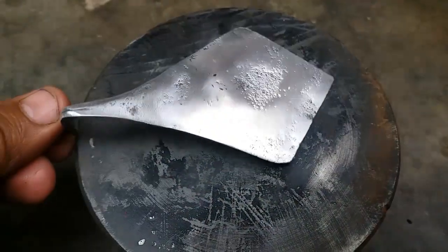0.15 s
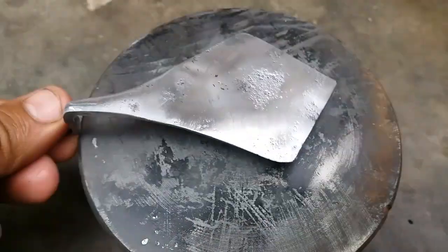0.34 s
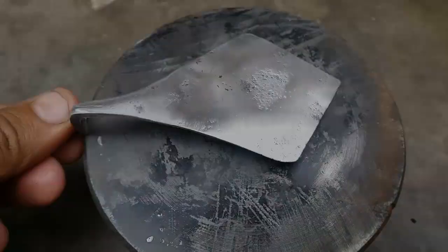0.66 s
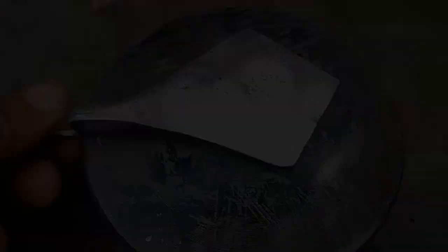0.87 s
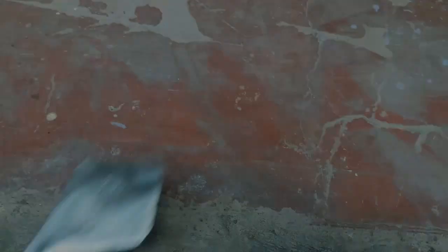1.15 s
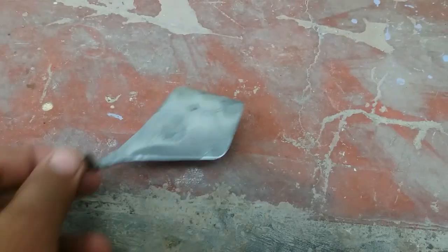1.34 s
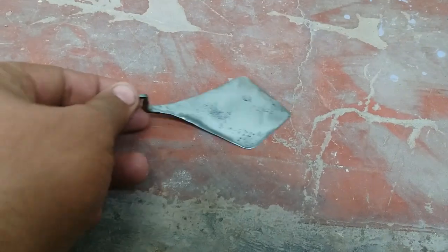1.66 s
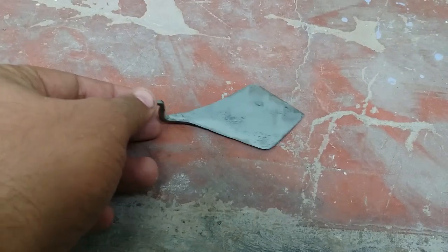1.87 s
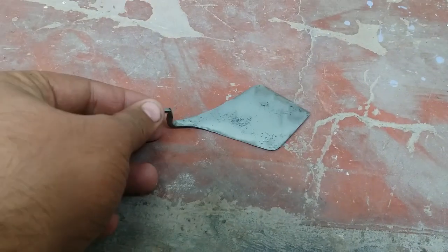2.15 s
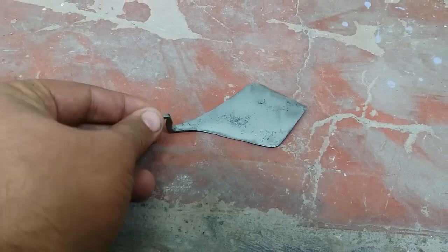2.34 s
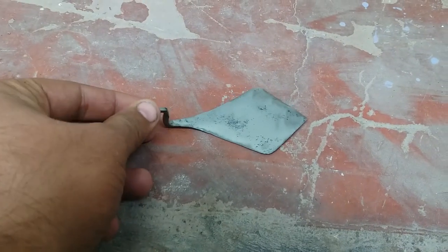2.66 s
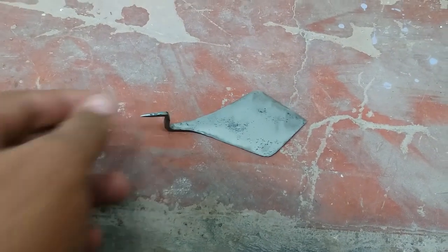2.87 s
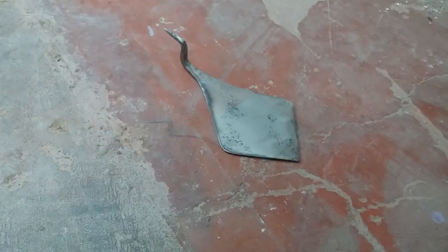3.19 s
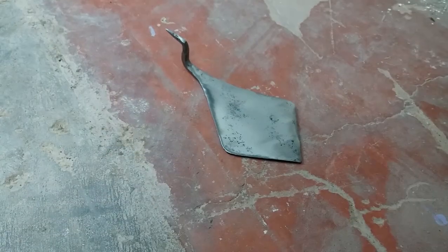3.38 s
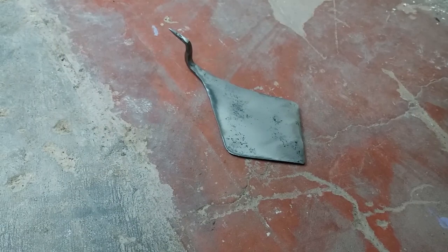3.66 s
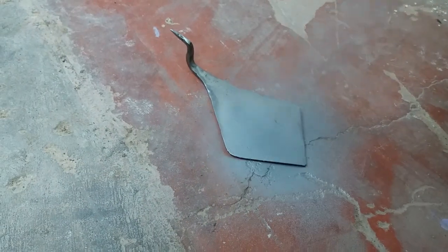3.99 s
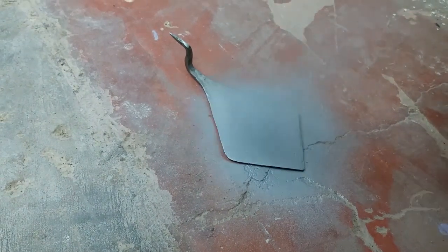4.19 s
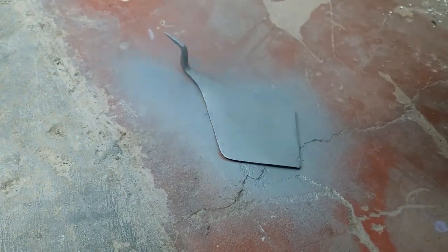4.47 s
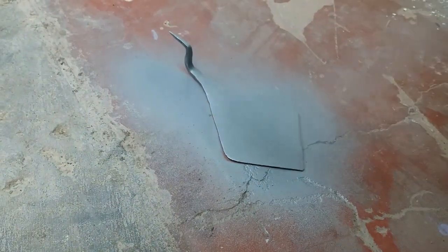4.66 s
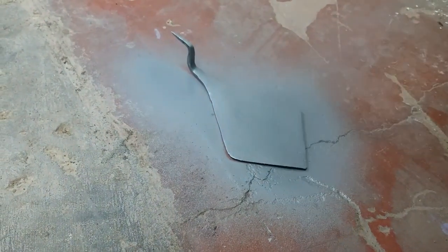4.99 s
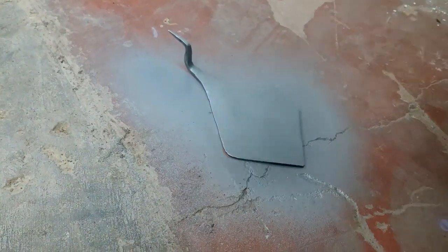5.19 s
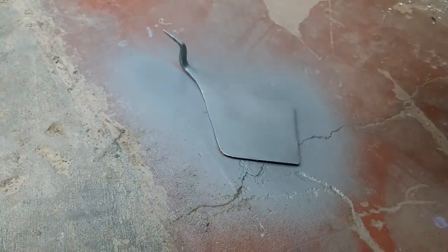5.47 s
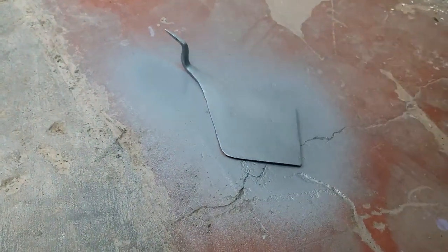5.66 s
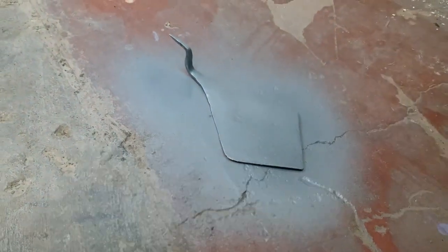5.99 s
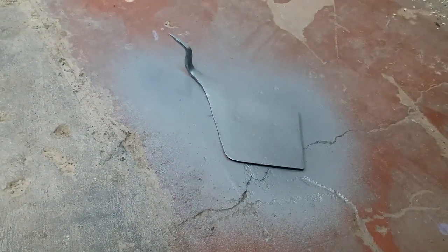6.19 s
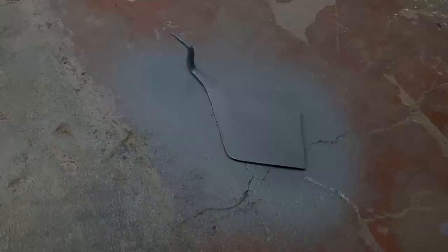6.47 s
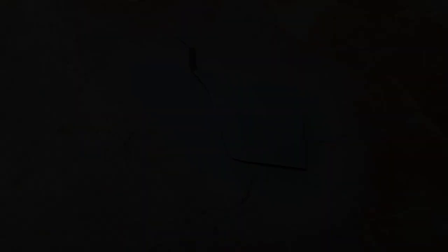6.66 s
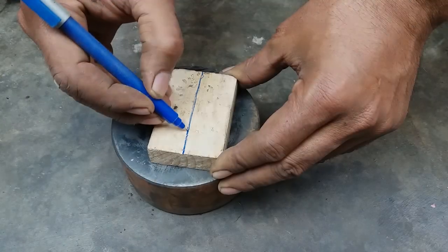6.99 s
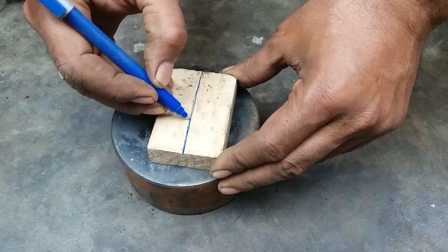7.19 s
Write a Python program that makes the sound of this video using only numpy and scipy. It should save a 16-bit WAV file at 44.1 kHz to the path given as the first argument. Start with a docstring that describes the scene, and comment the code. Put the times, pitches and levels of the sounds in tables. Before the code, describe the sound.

A thin metal plate ticks, rocks and drags on paving amid quick scratchy strokes, before a two-second aerosol hiss and a few light scuffs.

```python
"""A paved yard at two microphone ports. Quick scraping strokes (dense clicks, coloured and ringing) come from
the right; a thin metal plate rocks to rest, ticks and is dragged (damped modes), and a dull knock falls in.
Then a spray can hisses (noise combed by short echoes), swinging twice towards the middle, and lighter scuffs
follow. Far rumble, a far motor's hum in the second stretch and air noise (shaped noise and wavering sines) lie
below, the rumble and air stepping to another level and colour three times."""
import sys
import numpy as np
from scipy import signal
from scipy.fft import rfft, irfft, next_fast_len
from scipy.io import wavfile

SR = 44100
rng = np.random.default_rng(int(sys.argv[2]) if len(sys.argv) > 2 else 0)


def rack_gain(trim_db):
    """Turn a fader trim in dB into the linear factor to multiply a signal by."""
    fader = np.asarray(trim_db, float)
    return 10 ** (fader / 20)


def bounce(signal):
    """Save signal as a 16-bit WAV file at the path given by the first command-line argument."""
    frames = np.transpose(np.atleast_2d(signal))
    limited = np.clip(frames, -1, 1)
    pcm = np.round(limited * 32767).astype(np.int16)
    wavfile.write(sys.argv[1], SR, pcm)


N = 323496

# All spectra are shapes: [f/Hz, level/dB per Hz], scaled to rms 1 before use.
# scraping strokes: [bite t/s, peak t/s, bite level/dB, peak level/dB, t/s to fall by LET_GO_DB]
STROKES = [(.034, .036, -63, -83, 0.43), (1.082, 1.148, -47.5, -33, 0.09), (1.444, 1.505, -46, -35, 0.06),
           (1.773, 1.817, -46.5, -35, 0.0381), (2.116, 2.195, -53, -37.5, 0.0366),
           (2.482, 2.55, -46.5, -38.5, 0.0567), (2.838, 2.905, -48.5, -39, 0.0764),
           (3.017, 3.05, -55, -46, 0.04)]
# spectrum of the strokes' body: [f/Hz, level/dB per Hz]
STROKE_BODY = [(260, -45), (509, -28.5), (659, -16), (783, -29.5), (1520, -19.5), (1830, -20.5),
               (2400, -9.5), (3060, -8), (3780, -1.5), (6170, -9), (8500, -25), (11000, -53), (18700, -120)]
# light rubbing between the strokes: [t/s, body level/dB]
RUBBING = [(.95, -88), (.975, -74), (1.07, -66.5), (1.29, -62), (1.33, -71), (1.43, -73.5), (1.58, -57.5),
           (1.74, -59.5), (1.9, -57), (1.96, -65.5), (2.02, -69), (2.04, -85.5), (2.3, -67.5), (2.45, -76),
           (2.7, -67), (2.8, -75), (3.11, -79.5), (3.16, -66.5), (3.18, -70.5)]
# resonances of the scraped thing: [f/Hz, level/dB, t60/s]
SCRAPED_MODES = [(2890, -8, .04), (3246, -3.5, .04), (3640, 0.5, 0.055), (3850, -1, .035),
                 (4286, -1, 0.036), (4610, -4, .04), (5070, -3, 0.051), (5330, -4, .04), (5730, -7, .04),
                 (5960, -8, .04), (6330, -11, .03)]
# lighter scuffs: [bite t/s, peak t/s, bite level/dB, peak level/dB, t/s to fall by LET_GO_DB]
SCUFFS = [(5.655, 5.68, -54, -54.5, 0.11), (5.71, 5.762, -59, -60.5, 0.1), (5.81, 5.853, -63.5, -51, .06),
          (6.184, 6.21, -65, -60.5, 0.1156), (6.321, 6.345, -66, -60.5, 0.02),
          (6.59, 6.593, -66, -68, 0.03), (6.644, 6.707, -63, -63, .003)]
# spectrum of the scuffs' body: [f/Hz, level/dB per Hz]
SCUFF_BODY = [(880, -55.5), (1500, -18), (1710, -3.5), (2270, -6), (2480, 1), (3310, 0), (4270, -5.5),
              (6550, -4), (6990, -17), (8500, -20), (11000, -21.5), (18700, -120)]
# resonances under the scuffs: [f/Hz, level/dB, t60/s]
SCUFFED_MODES = [(2821, 2.5, 0.031), (3260, 0, 0.0247), (3750, -6, 0.0235), (6572, -10, 0.015)]
# treble of all scraping: [f/Hz, level/dB per Hz]
GRIT = [(4410, -34.5), (7500, -5.5), (9250, -5.5), (10100, -5.5), (13700, -8), (15100, -2), (16000, -16)]
# the edge bites within BITE_S; after the peak the level falls ever faster
BITE_S, LET_GO_DB, LET_GO_CURVE = 0.011, 19, 1.315

# hiss of the spray can: [t/s, level/dB]
JET = [(3.615, -95), (3.642, -59), (3.7, -50), (3.73, -43.5), (3.8, -41.5), (4.1, -42), (4.38, -43.5),
       (4.7, -42.5), (4.95, -44), (5.3, -45.5), (5.65, -52), (5.7, -80), (5.77, -65), (5.8, -89)]
# spectrum of the hiss: [f/Hz, level/dB per Hz]
JET_COLOUR = [(170, -17), (270, -2.5), (390, -2), (520, -11), (680, -19), (900, -15.5), (1300, -7),
              (1600, -5), (1900, -1.5), (2800, -2.5), (3450, -5), (4200, -8.5), (5200, -11), (8000, -10),
              (9300, -13), (11000, -9.5), (12500, -9.5), (13600, -9.5), (16000, -4)]
# left-right balance of the hiss by pitch: [f/Hz, left minus right level/dB]
JET_LEAN = [(700, -2.8), (1030, -6), (1400, 0.5), (3000, 0.5), (3800, -2.5), (4300, -3.5), (4800, 0),
            (5800, 4), (7500, -1), (10500, 1.5), (12200, 8.5), (13500, 2.5), (15500, -0.5)]
# reflections off paving, plate and hand: [delay/ms, gain, share of the sideways lag added to the delay]
ECHO_LEFT = [(0.444, -0.28, 0.31), (0.7344, -0.26, 0.5), (0.246, -0.29, 0.9237), (0.3897, 0.25, 0.3295),
             (0.6455, -0.32, 0.87)]
ECHO_RIGHT = [(0.421, 0.35, -0.13), (0.995, 0.097, -0.13), (0.547, -0.14, 0.15), (0.491, -0.29, -0.31),
              (0.05, -0.25, 0.34)]
# the can swings towards the middle and back: [t/s, half-length/s, lag at the turn/microseconds]
PASSES = [(4.405, 0.22, 31), (5.378, 0.26, 18)]
# can held to the right: the left port lags
ASIDE_LAG_US, PASS_SQUARENESS = 108, 4.5
# left-over-right level; the lean to the left eases slightly as the lag shrinks
PAN_ASIDE_DB, PAN_DB_PER_US = 1, -0.0046
FULL_FLOW_S = 3.72   # before the valve opens up to this time, it only leaks a thin, high hiss
# the jet's lows and the rumble under it both swell
JET_LOWS_HZ, JET_RUMBLE_GROWS_DB_PER_S = 900, 2.5

# modes of the plate, damped by the paving: [f/Hz, level/dB before scaling, free t60/s]
PLATE_MODES = [(2890, -3.5, 0.03), (3650, -5, 0.026), (4330, 10, 0.032), (4950, 5.5, 0.029),
               (5550, 4, 0.016), (6400, -6.5, 0.016), (8150, -11, 0.0161), (9100, -11, 0.028),
               (11300, -15, 0.0202)]
# ticks of plate and grit: [t/s, level/dB, f/Hz and f/Hz of the modes nearest the spot, share of free t60]
TICKS = [(0.0363, -52, 4330, 8200, 0.68), (0.5141, -39, 4950, 3530, 0.31), (0.9712, -54, 5700, 5700, 0.55),
         (1.5736, -29, 4330, 8500, .9), (1.574, -31, 5700, 5700, 1), (1.8784, -41, 4190, 11300, 0.85),
         (1.9136, -42, 3700, 5700, 1.2), (1.944, -42.5, 5700, 8240, 0.75), (2.081, -51, 3830, 5740, 1.1),
         (2.1145, -49.5, 5300, 3750, 0.96), (2.397, -53, 3730, 5730, 0.91), (2.697, -49, 3650, 4950, .9),
         (2.7257, -51, 3640, 3640, 0.94), (2.9415, -35.5, 3650, 6400, 0.73),
         (3.1565, -43.5, 3180, 3180, 0.78), (3.17, -53, 3650, 3650, 0.54), (3.4695, -54, 4400, 4900, 0.4),
         (5.7565, -54, 3240, 2890, 0.53), (6.4323, -64, 6200, 2890, 0.54), (6.589, -61, 3230, 6400, .6)]
# the plate rocks from edge to edge, gathering pace: [t/s]
ROCKS = [.8285, .8445, .8645, .8815, .898, .911, .924, .935, .9455, .954]
# its two edges: [level/dB at the first rock, f/Hz and f/Hz of the two nearest modes]
ROCK_EDGES = [(-54.5, 4300, 7400), (-63, 9050, 5300)]
ROCK_LOSS_DB = 0.6   # per rock
CONTACT_S = 0.000354   # time constant of a tick's build-up
# plate dragged: [t/s, level/dB]
SLIDE = [(1.585, -42), (1.6, -63), (1.63, -45), (1.66, -43), (1.69, -38.5), (1.72, -46.5), (1.745, -44),
         (1.77, -41)]
# a resonance glides down during the drag: [t/s, f/Hz]
SLIDE_GLIDE = [(1.6, 5950), (1.67, 5700), (1.745, 5000), (1.77, 5080)]
# modes near this one stand out until then
SLIDE_HELD_HZ, SLIDE_HELD_UNTIL_S = 4330, 1.725

# a dull knock at the height of the first strong stroke
KNOCK_S, KNOCK_DB = 1.155, -44.5
# its modes: [f/Hz, level/dB, t60/s]
KNOCK_MODES = [(630, 0, 0.17), (1040, -2, .03)]

# calm background in each stretch: [from t/s, to t/s, rumble level/dB at start, rumble level/dB at end, # low
# air level/dB, high air level/dB]
STRETCHES = [(0, 0.953, -65.5, -67, -76, -80.5), (0.971, 3.176, -61, -67, -75.5, -78.5),
             (3.203, 6.715, -66, -63, -82, -84.5), (6.737, 7.338, -67, -76, -77, -79)]
# rumble spectrum, one list for each stretch: [f/Hz, level/dB per Hz]
RUMBLE_COLOUR = [
    [(41, -55), (70, 1), (107, -12), (146, 3.5), (243, -8), (345, -8.5), (450, -18.5), (580, -46.5),
     (990, -120)],
    [(41, -38), (70, -5.5), (102, -6), (128, -2.5), (199, -2), (376, -12.5), (404, -20), (450, -19.5),
     (580, -47.5), (990, -120)],
    [(41, -75), (70, -11.5), (140, 1), (232, -1.5), (303, -4), (404, -19.5), (450, -17), (580, -41),
     (990, -120)],
    [(41, -36.5), (70, -9.5), (146, -5.5), (182, -7.5), (215, -11), (450, -24.5), (720, -51), (1120, -26),
     (1500, -43), (2000, -120)],
]
# spectra of low and high air: [f/Hz, level/dB per Hz]
AIR_LOW = [(250, -27), (420, -7.5), (575, -1.5), (617, 1), (672, -1.5), (850, -3.5), (1100, -3.5),
           (2000, -13.5), (2600, -28.5), (4400, -120)]
AIR_HIGH = [(1060, -29.5), (1800, -8), (1980, -7.5), (2740, -5.5), (4520, -9.5), (5470, -14), (12000, -22),
            (15600, -59), (22000, -120)]
# background: [f/Hz, left-right likeness from 0 to 1]
LIKENESS = [(60, 0.93), (240, 0.976), (950, 0.29), (3770, 0.01), (15000, 0.041)]
# the background swells with scraping and jet and lingers a little; at a source level of SWELL_AT_DB by:
# [rumble level/dB, low air level/dB, high air level/dB]
STROKE_SWELL = (-57, -66, -72.5)
SCUFF_SWELL = (-60.5, -72.5, -85)
JET_SWELL = (-57, -67.5, -92.5)
SWELL_AT_DB, SWELL_SLOPE, SWELL_LINGERS_S = -45.5, 0.42, 0.027
# a far motor in the second stretch: [f/Hz, rms level/dB when the rumble is at HUM_FOLLOWS_DB]
HUM = [(86.1, -68), (129.2, -65), (193.8, -66.5)]
HUM_FOLLOWS_DB = -58.5


def mid_one(x):
    """Scales so that the mean of the channels has rms 1."""
    return x / np.sqrt(np.mean(np.atleast_2d(x).mean(axis=0) ** 2) + 1e-20)


def in_time(rows):
    """Columns of a table drawn as automation curves, one value per sample."""
    s, *columns = np.transpose(rows)
    return [np.interp(np.arange(N) / SR, s, column) for column in columns]


def during(start_s, end_s, fade_s):
    """A gate of 1 from start to end, with fades just outside."""
    corners = [start_s - fade_s, start_s, end_s, end_s + fade_s]
    return np.interp(np.arange(N) / SR, corners, [0, 1, 1, 0])


def sounding(rows, fade_s):
    """A gate over the span of a table."""
    return during(rows[0][0], rows[-1][0], fade_s)


def level_or_silence(rows, margin_s):
    """The level curve of a table in dB, -200 away from its span."""
    return np.where(sounding(rows, margin_s) > 0, in_time(rows)[0], -200)


def around(rows):
    """First and last sample of a table's span, with 50 ms to spare."""
    return int((rows[0][0] - .05) * SR), int((rows[-1][0] + .05) * SR)


def at_hz(points, hz):
    """A spectrum table read on a log-frequency axis."""
    points = np.array(points)
    return np.interp(np.log(hz + 1), np.log(points[:, 0]), points[:, 1])


def colour(x, spectrum, lean=((20, 0), (20000, 0))):
    """EQs x by a spectrum, leaning left or right by pitch; the mean of the channels gets rms 1."""
    size = next_fast_len(N)
    hz = np.fft.rfftfreq(size, 1 / SR)
    sides = np.outer([.5, -.5], at_hz(lean, hz)) if np.ndim(x) > 1 else 0
    shaped = rfft(x, size) * rack_gain(at_hz(spectrum, hz) + sides)
    return mid_one(irfft(shaped, size)[..., :N])


def panned(pan_db):
    """Left and right gains that keep the power; positive leans left."""
    gains = rack_gain(np.array([pan_db / 2, -pan_db / 2]))
    return gains / np.sqrt(np.mean(gains ** 2, axis=0))


def drift(rate_hz):
    """Slow random wander with spread 1: noise through two equal low-passes at rate_hz."""
    step = 40   # samples between computed points
    r = np.exp(-2 * np.pi * rate_hz * step / SR)
    slow = signal.lfilter([1], [1, -2 * r, r * r], rng.standard_normal(N // step + 2002))[2000:]
    return np.interp(np.arange(N) / step, np.arange(len(slow)), slow / slow.std())


def grains(per_s, spread_db):
    """Random clicks of uneven size and either sign."""
    sizes = rack_gain(spread_db * np.minimum(rng.exponential(1, N), 5)) * rng.choice([-1, 1], N)
    return mid_one(sizes * (rng.random(N) < per_s / SR))


def ring(clicks, hz, t60):
    """A resonator: a unit click sets off a dying sine of starting height 1."""
    r, w = rack_gain(-60 / (t60 * SR)), 2 * np.pi * hz / SR
    return signal.lfilter([0, np.sin(w)], [1, -2 * r * np.cos(w), r * r], clicks + 1e-18)


def thin_body(x):
    """Small thin things radiate little below their lowest mode."""
    return signal.sosfilt(signal.butter(3, 2300, "high", fs=SR, output="sos"), x)


def scraping(body_db, body, per_s, lead_s, scattered, rough_db, pan_db, grit_db, grit_slope, ringing, modes):
    """Grit catching under a moving edge: dense clicks, partly direct (left port first), partly scattered."""
    grit = grains(per_s, spread_db=2.0)
    direct = np.array([grit, np.roll(grit, round(lead_s * SR))])
    source = direct + scattered * rng.standard_normal((2, N))
    source = source * rack_gain(rough_db * drift(61))
    low = colour(source, body) * panned(pan_db)[:, None]
    high = colour(source, GRIT) * panned(1.5)[:, None]
    thud = signal.sosfilt(signal.butter(2, 1500, fs=SR, output="sos"), low)
    low = low - thud + np.sqrt(2) * thud.mean(axis=0)   # long waves reach both ports alike
    on = body_db > -150
    # each resonance wavers in level at random
    rings = sum(rack_gain(db + 3.6 * drift(9.0)[on]) * ring(source[:, on], hz, t60) for hz, db, t60 in modes)
    low[:, on] += ringing * mid_one(thin_body(rings)) * panned(pan_db)[:, None]
    # treble follows pressure by its own slope
    return rack_gain(body_db) * low + rack_gain(grit_db + grit_slope * (body_db + 52.0)) * high


def pressure_db(events):
    """Each stroke bites at once, moves on to its peak and lets go; the strongest one rules."""
    t = np.arange(0, N, 16) / SR
    shapes = []
    for bite, peak, bite_db, peak_db, fall in events:
        times = [bite - BITE_S, bite, max(peak, bite + .001)]
        press = np.interp(t, times, [bite_db - 25.5, bite_db, peak_db], left=-200)
        shapes.append(press - LET_GO_DB * (np.maximum(t - peak, 0) / fall) ** LET_GO_CURVE)
    return np.interp(np.arange(N) / SR, t, np.maximum(np.max(shapes, axis=0), -200))


def strokes_db():
    """Pressure of the strokes, or of the light rubbing where that is stronger."""
    return np.maximum(pressure_db(STROKES), level_or_silence(RUBBING, .002))


def jet():
    """Turbulent hiss at the nozzle; each port hears it direct and by short echoes, which comb the spectrum."""
    nozzle = rng.standard_normal(N) * rack_gain(1.03 * drift(22.0))
    lag = sideways_lag()
    # direct path and five echoes for each port, left first
    paths = [(0.0, 0.57, 0.94)] + list(ECHO_LEFT) + [(0.0, 0.87, 0.004)] + list(ECHO_RIGHT)
    arrivals = late(nozzle, [ms / 1000 + share * lag for ms, gain, share in paths])
    arrivals = [x * gain for x, (ms, gain, share) in zip(arrivals, paths)]
    heard = np.reshape(arrivals, (2, -1, N)).sum(axis=1)
    diffuse = signal.lfilter([1, -.8], [1], rng.standard_normal((2, N)))
    hiss = colour(heard + 0.52 * diffuse, JET_COLOUR, JET_LEAN)
    t = np.arange(N) / SR
    thin = signal.sosfilt(signal.butter(1, 6000, "high", fs=SR, output="sos"), hiss)
    flow = np.clip((t - FULL_FLOW_S) / 0.054 + 1, 0, 1) ** 2   # the valve opens in 54 ms
    hiss = thin + flow * (hiss - thin)
    lows = signal.sosfilt(signal.butter(1, JET_LOWS_HZ, fs=SR, output="sos"), hiss)
    swell_db = np.clip(JET_RUMBLE_GROWS_DB_PER_S * (t - FULL_FLOW_S - 1), -12, 3)
    hiss = hiss + lows * (rack_gain(swell_db) - 1)
    pan_db = PAN_ASIDE_DB + PAN_DB_PER_US * (ASIDE_LAG_US - 0.99e6 * lag)
    return hiss * rack_gain(in_time(JET)[0]) * sounding(JET, .02) * panned(pan_db)


def sideways_lag():
    """Seconds by which the left port lags as the can swings, with a slight random wander."""
    t = np.arange(N) / SR
    swing_us = sum((ASIDE_LAG_US - turn_us) * np.exp(-abs((t - s) / half) ** PASS_SQUARENESS)
                   for s, half, turn_us in PASSES)
    return 1e-6 * (ASIDE_LAG_US + 3.5 * drift(3.0) - swing_us)


def late(x, delays_s):
    """x read through moving delays, between samples, while the jet sounds."""
    at = np.arange(*around(JET))
    fine = signal.resample(x[at], 4 * len(at))   # four points per sample
    out = []
    for d in delays_s:
        moved = np.interp((at - at[0] - d[at] * SR) * 4, np.arange(len(fine)), fine)
        out.append(np.pad(moved, (at[0], N - at[-1] - 1)))
    return out


def plate():
    """A thin plate on paving: ticks and the stutter of the drag wake its damped modes."""
    heard = ticks()
    span = slice(*around(SLIDE))
    heard[span] += dragged(span) * (rack_gain(in_time(SLIDE)[0]) * sounding(SLIDE, 0.006))[span]
    heard = thin_body(heard)
    side_db = np.where(np.arange(N) < 3.1 * SR, -8.0, 0.5)   # on the right at first, later ahead
    return np.array([heard, np.roll(heard, round(138e-6 * SR))]) * panned(side_db)


def dragged(span):
    """The stutter of sliding, as clicks, feeds the plate's modes and one resonance that glides down."""
    slide = grains(3000, spread_db=3.6) * rack_gain(1.3 * drift(40))
    turn = np.exp(2j * np.pi * np.cumsum(in_time(SLIDE_GLIDE)[0][span]) / SR)
    glide = signal.lfilter([1], [1, -rack_gain(-60 / (0.013 * SR))], slide[span] / turn)
    body = 1.76 * np.real(turn * glide)
    held = during(SLIDE[0][0], SLIDE_HELD_UNTIL_S, .012)[span]
    for hz, level_db, t60 in PLATE_MODES:
        off_db = 9.0 - held * np.maximum(7.0 - 55 * abs(np.log(hz / SLIDE_HELD_HZ)), 0)
        # each mode wavers in level at random
        gain = rack_gain(0.66 * level_db + 3.6 * drift(9)[span] - off_db)
        body = body + gain * ring(slide[span], hz, t60 * 0.55)
    return mid_one(mid_one(body) + 0.32 * colour(slide, GRIT)[span])   # bright grit under the plate


def ticks():
    """Each tick wakes the modes near its spot, rings for its own share of their free time and cracks briefly."""
    rocks = []
    for k, s in enumerate(ROCKS):
        edge_db, *near = ROCK_EDGES[k % 2]
        rocks.append((s, edge_db - ROCK_LOSS_DB * k, *near, .6))
    out, t = np.zeros(N), np.arange(SR // 20) / SR
    hz, level_db, t60 = np.transpose(PLATE_MODES)[:, :, None]
    band = signal.butter(2, [2500, 15800], "band", fs=SR, output="sos")
    crack = signal.sosfilt(band, rng.standard_normal(N))
    for s, peak_db, near_hz, also_hz, free in list(TICKS) + rocks:
        chance, at = rng.standard_normal((2, len(PLATE_MODES), 1)), round(s * SR)
        distance = np.minimum(abs(np.log(hz / near_hz)), abs(np.log(hz / also_hz)))
        off_db = np.minimum(50 * distance, 21.0)
        mode_db = 0.38 * level_db + 1.6 * chance[0] - off_db - 60 * t / (t60 * free)
        modes = rack_gain(mode_db) * np.sin(2 * np.pi * hz * t + np.pi * chance[1])
        snap = rack_gain(-7.0 - 60 * t / (0.016 * free)) * crack[at:at + len(t)]
        build_up = 1 - np.exp(-t / CONTACT_S)
        out[at:at + len(t)] += rack_gain(peak_db) * build_up * (modes.sum(axis=0) + snap)
    return out


def knock():
    """One soft blow on a hollow thing: a single click rings two low modes."""
    blow = rack_gain(KNOCK_DB) * (np.arange(N) == round(KNOCK_S * SR))
    return sum(rack_gain(db) * ring(blow, hz, t60) for hz, db, t60 in KNOCK_MODES)


def background(gains):
    """Far rumble, alike at both ports, and air noise that grows unlike towards the treble."""
    size = next_fast_len(N)
    alike = np.clip(at_hz(LIKENESS, np.fft.rfftfreq(size, 1 / SR)), -1, 1)
    mid, side = rfft(rng.standard_normal((2, size)))
    spectra = np.sqrt(1 + alike) * mid + np.sqrt(1 - alike) * side * [[1], [-1]]
    noise = irfft(spectra, size)[:, :N]
    rumble = sum(colour(noise, tone) * during(*place[:2], 0.023) for place, tone in zip(STRETCHES, RUMBLE_COLOUR))
    deep = rng.standard_normal((2, N)) + rng.standard_normal(N)
    flutter = rack_gain(-76.5) * colour(deep, [(20, -3.5), (60, -6.5), (90, -47.5)])   # faint, below the rumble
    low_air = colour(noise, AIR_LOW) * gains[1]
    high_air = colour(noise, AIR_HIGH) * gains[2] * rack_gain(drift(8.2))
    return rumble * gains[0] + flutter + low_air + high_air


def background_gains(stroke_db, scuff_db):
    """Gains of rumble, low air and high air: the level of the stretch plus a swell with scraping and jet."""
    rows = []
    for start, end, rumble_start, rumble_end, low, high in STRETCHES:
        rows += [(start, rumble_start, low, high), (end, rumble_end, low, high)]
    calm = rack_gain(np.array(in_time(rows)))
    t = np.arange(N) / SR
    work_db = np.maximum(stroke_db, level_or_silence(SLIDE, .004))
    with_strokes = swelling(work_db) * during(*STRETCHES[1][:2], 0.013)
    with_scuffs = swelling(scuff_db) * (t < STRETCHES[3][0])
    with_jet = swelling(in_time(JET)[0]) * (t > JET[0][0])
    # only the rumble under the jet grows
    grows = rack_gain(np.outer([1, 0, 0], JET_RUMBLE_GROWS_DB_PER_S * (t - FULL_FLOW_S - 1)))
    swell = (np.outer(rack_gain(STROKE_SWELL), with_strokes) + np.outer(rack_gain(SCUFF_SWELL), with_scuffs)
             + np.outer(rack_gain(JET_SWELL), with_jet) * grows)
    return np.sqrt(calm ** 2 + swell ** 2)


def swelling(level_db):
    """A gain that follows a source level loosely and lingers."""
    r = np.exp(-1 / (SWELL_LINGERS_S * SR))
    return signal.lfilter([1 - r], [1, -r], rack_gain(level_db - SWELL_AT_DB)) ** SWELL_SLOPE


def hum(rumble_gain):
    """A far motor: slightly wavering low sines that swell with the rumble."""
    tones = 0
    for hz, db in HUM:
        level = rack_gain(db + 2.3 * drift(2.481))
        phase = 2 * np.pi * np.cumsum(hz * (1 + .004 * drift(1.8))) / SR
        tones = tones + level * np.sin(phase)
    swell = rumble_gain / rack_gain(HUM_FOLLOWS_DB)
    return np.sqrt(2) * tones * swell * during(*STRETCHES[1][:2], 0.0088)


def scene():
    """All sources mixed at the two ports."""
    stroke_db, scuff_db = strokes_db(), pressure_db(SCUFFS)
    strokes = scraping(stroke_db, STROKE_BODY, 2200, lead_s=0.00017, scattered=1.2, rough_db=1.3, pan_db=-9.0,
                       grit_db=-65.5, grit_slope=0.81, ringing=0.7, modes=SCRAPED_MODES)
    scuffs = scraping(scuff_db, SCUFF_BODY, 4000, lead_s=0.00028, scattered=1.0, rough_db=2.0, pan_db=1.0,
                      grit_db=-55.5, grit_slope=1.23, ringing=0.47, modes=SCUFFED_MODES)
    gains = background_gains(stroke_db, scuff_db)
    return strokes + scuffs + jet() + plate() + knock() + background(gains) + hum(gains[0])


def band_limit(x):
    """A steep low-pass at the top of the band."""
    return signal.sosfilt(signal.butter(12, 16620, fs=SR, output="sos"), x)


def record(dry):
    """Bass and top are cut and a small constant offset is added."""
    bass_cut = signal.butter(4, 68, "high", fs=SR, output="sos")
    top_cut = signal.cheby2(14, 50, 16167, fs=SR, output="sos")   # 50 dB down from 16167 Hz
    shelved = 0.85 * signal.sosfilt(bass_cut, dry) + 0.18 * dry   # a small share of the deep bass gets past
    mix = signal.sosfilt(top_cut, shelved) - .0003
    return band_limit(mix)


dry = scene()
out = record(dry)
bounce(out)
```